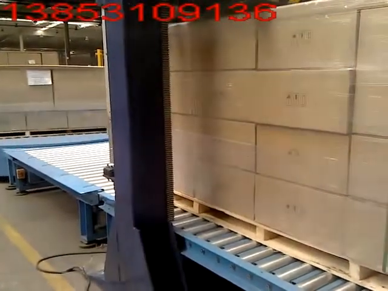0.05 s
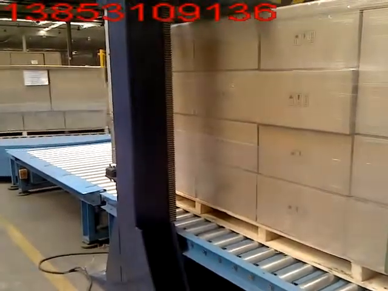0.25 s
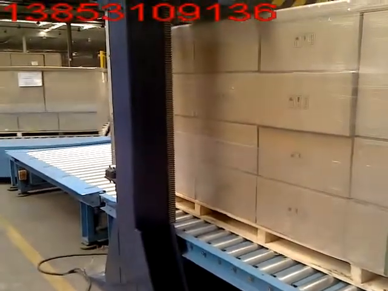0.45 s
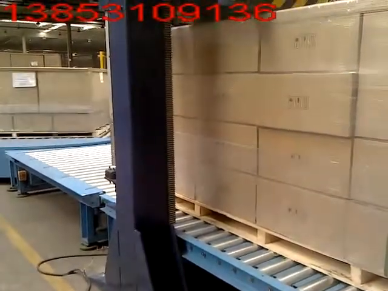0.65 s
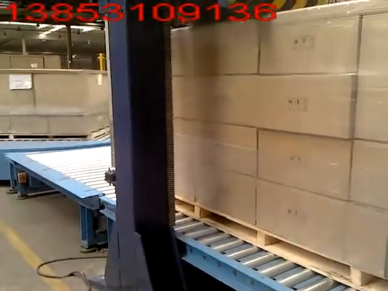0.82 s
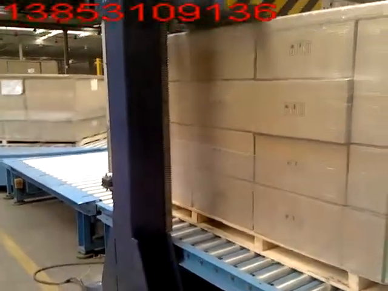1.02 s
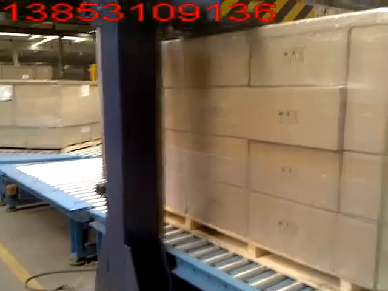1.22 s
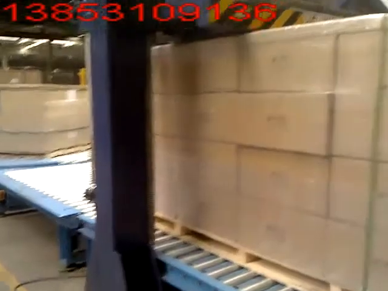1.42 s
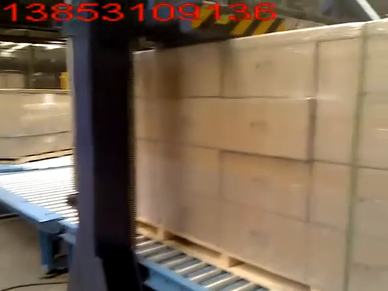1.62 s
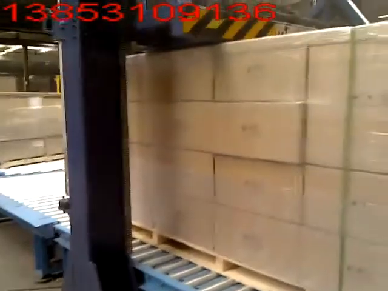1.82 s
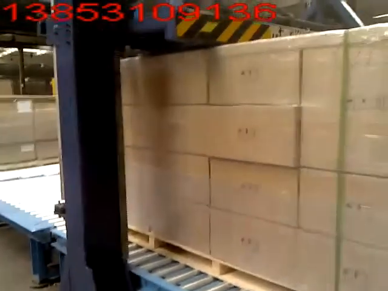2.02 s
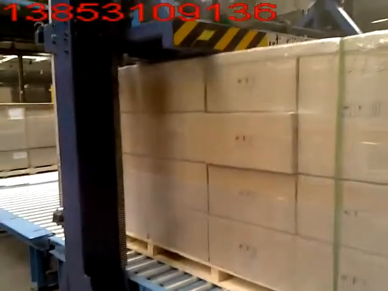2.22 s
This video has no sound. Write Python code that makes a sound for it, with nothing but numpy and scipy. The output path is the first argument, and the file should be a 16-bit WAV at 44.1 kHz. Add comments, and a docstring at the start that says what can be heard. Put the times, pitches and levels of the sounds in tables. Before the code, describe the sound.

A loud steel clang from pallet packaging machinery rings away over steady factory noise.

```python
"""Pallet packaging machine in a factory hall

Over the steady din of the hall comes a knock, then a run of blows excites the modes of a steel frame:
a loud clang that overloads the microphone and rings away. The damped load thuds and scrapes, latches
snap and ring, and a low bump sounds close by. A drive starts up with a rush and a thin harmonic whine.
Impacts and scrapes leave a diffuse reverberant tail."""
import sys
import numpy as np
from scipy import signal
from scipy.fft import rfft, irfft
from scipy.io import wavfile
from scipy.ndimage import uniform_filter1d

SR = 44100
rng = np.random.default_rng(int(sys.argv[2]) if len(sys.argv) > 2 else 0)


def store_pcm(level_fs):
    """Save levels as 16-bit WAV."""
    pcm = np.round(np.clip(level_fs, -1, 1) * 32767).astype(np.int16)
    wavfile.write(sys.argv[1], SR, np.atleast_2d(pcm).T)


N = 103635
T = np.arange(N) / SR
FREQS = np.maximum(np.arange(N // 2 + 1) * SR / N, 1)


def undb(db):
    """Decibels to amplitude ratio."""
    return 10 ** (np.asarray(db) / 20)


def contact(hz, brightness_hz):
    """Finite contact time acts as a low-pass: 12 dB an octave down above brightness_hz."""
    return 1 / np.hypot(1, (hz / brightness_hz) ** 2)


def noise(spectrum, brightness_hz=None):
    """Random phases under a spectral envelope give unit noise, dulled by an optional soft contact."""
    hz, db = np.array(spectrum).T
    gain = undb(np.interp(np.log(FREQS), np.log(hz), db)) * np.minimum(FREQS / hz[0], 1) ** 2
    if brightness_hz:
        gain = gain * contact(FREQS, brightness_hz)
    x = irfft(gain * np.exp(2j * np.pi * rng.random(len(FREQS))), N)
    return x / x.std()


def drift(rate_hz):
    """Low-passed noise gives a random drift of unit spread."""
    x = irfft(rfft(rng.standard_normal(N)) * np.exp(-(FREQS / rate_hz) ** 2), N)
    return x / np.sqrt(np.mean(x ** 2))


def tone(hz, waver):
    """Random modulation: a unit-power sine wavers in level and phase, as heard across a hall."""
    swing = 1 + waver * (drift(rate_hz=6) + 1j * drift(rate_hz=6))
    carrier = np.exp(2j * np.pi * (hz * T + rng.random()))
    return np.sqrt(2 / (1 + 2 * waver ** 2)) * np.real(swing * carrier)


def strike(start_s, attack_s, t60_s):
    """Envelope of a damped vibration: linear rise, exponential decay."""
    age = np.maximum(T - start_s, 0)
    return np.minimum(age / attack_s, 1) * np.exp(-np.log(1000) * age / t60_s)


def band_decay(x, start_s, attack_s, t60_s, damping):
    """Frequency-dependent damping: t60_s holds up to 1 kHz and shortens in each octave above."""
    octave = np.clip(np.log2(FREQS / 1000), 0, 3)
    spectrum = rfft(x)
    bands = [irfft(spectrum * np.maximum(1 - abs(octave - k), 0), N) for k in range(4)]
    return sum(band * strike(start_s, attack_s, t60_s / (1 + damping * k * k))
               for k, band in enumerate(bands))


def hall(x, wet_db):
    """Reverberation: convolution with decaying noise adds a diffuse tail with little deep bass."""
    tail = band_decay(rng.standard_normal(N), start_s=0, attack_s=0.024, t60_s=2.38, damping=0.15)
    tail = signal.sosfilt(signal.butter(2, 133, "high", fs=SR, output="sos"), tail)
    return x + undb(wet_db) * signal.fftconvolve(x, tail / np.linalg.norm(tail))[:N]


# background spectrum of the hall: frequency_hz, density_db
DIN_SPECTRUM = [(25, -8), (60, -4.5), (120, -9.5), (180, -9.5), (280, -2.5), (370, -2.5), (600, -1),
                (850, -6.5), (1400, -3.5), (2250, -6.5), (2650, -10.5), (3800, -11.5), (6000, -22),
                (7400, -33.5)]


def din():
    """Incoherent superposition: distant machines blur into steady noise."""
    return undb(-32.5) * noise(DIN_SPECTRUM)


# impacts on pallet and conveyor: start_s, level_db, brightness_hz, attack_s, t60_s
LOAD_IMPACTS = [(.0, -26.5, 468, 0.0033, 0.58), (0.213, -8.5, 650, 0.021, 0.19),
                (0.298, -6.5, 330, 0.014, .2), (0.424, -16.5, 616, 0.013, 0.26),
                (1.312, -10.5, 673, 0.0075, 0.38), (1.326, -15.5, 403, .004, 0.071),
                (1.376, -14, 920, .004, .2), (1.822, -25, 423, 0.0098, 0.64), (2.02, -21, 400, 0.038, 0.16),
                (2.164, -22.5, 550, 0.042, 0.39)]
# their response before the contact dulls it: frequency_hz, density_db
THUD_SPECTRUM = [(25, -33), (50, -1), (72, -8.5), (110, 5), (150, -2), (200, 1.5), (260, 3.5), (400, -1),
                 (490, 1), (620, -2.5), (1000, -4.5), (2500, -3.5), (5000, 5), (7500, -23.5)]


def thuds():
    """Heavy damping: soft, weighty contacts shake pallet and conveyor in dull, pitchless bursts."""
    bursts = sum(undb(db) * noise(THUD_SPECTRUM, brightness) * strike(start, attack, t60)
                 for start, db, brightness, attack, t60 in LOAD_IMPACTS)
    return hall(bursts, wet_db=-9.5)


# the steel frame's dense crowd of weak modes: frequency_hz, density_db
STEEL_SPECTRUM = [(100, -35), (400, -14), (750, -8), (1050, -9.5), (1400, -0.5), (1850, -7), (2200, -5.5),
                  (3000, -8), (4200, -13.5), (5600, -14), (7500, -20.5)]


def dense_modes(ripple_db=2):
    """Modal overlap: noise gathers into narrow, irregularly spaced resonances."""
    smooth = noise(STEEL_SPECTRUM)
    ripple = uniform_filter1d(uniform_filter1d(rng.standard_normal(len(FREQS)), size=50), size=50)
    rippled = irfft(rfft(smooth) * undb(ripple_db * ripple / ripple.std()), N)
    return rippled * smooth.std() / rippled.std()


# blows on the frame: start_s, level_db, brightness_hz
FRAME_BLOWS = [(.266, -5.5, 1800), (.281, -8.5, 3500), (.295, -7.5, 6000), (.35, -10.5, 4000),
               (.44, -18.5, 3000)]
# strong modes of the frame: pitch_hz, gain_db, t60_s
FRAME_MODES = [(748, -23, 1.3), (831, -24, 1.5), (974.5, -16, 1.4), (1082.6, -16.5, 1.3),
               (1243.5, -14.5, 1.7), (1382, -16, 2.4), (1505.5, -18, 1.5), (1562, -19, 1.2),
               (1616.5, -18, 1.5), (1747.5, -18, 1.4), (1925, -22, 1.2), (2080, -25, 2.2), (2277, -23, 1.2),
               (2554, -25, 1.3), (2752.6, -23, 1.6), (3137, -21, 1.1), (3848, -26, 1.4), (4240, -25, 1.2),
               (5351, -22, 1.1)]


def clang(attack_s=0.009):
    """Modal ringing: quick blows excite the steel frame, their energies adding in each strong mode."""
    steel = rfft(dense_modes())
    crowd, ring = 0, 0
    for start, db, brightness in FRAME_BLOWS:
        struck = irfft(steel * contact(FREQS, brightness), N)
        struck = np.roll(struck / struck.std(), rng.integers(N))  # decorrelates the blows
        crowd += undb(db) * band_decay(struck, start, attack_s, t60_s=0.73, damping=0.015)
    for hz, mode_db, t60 in FRAME_MODES:
        energy = sum((undb(db) * contact(hz, brightness) * strike(start, attack_s, t60)) ** 2
                     for start, db, brightness in FRAME_BLOWS)
        ring += undb(mode_db) * np.sqrt(energy) * tone(hz, waver=0.3)
    return hall(undb(-0.5) * crowd, wet_db=-7) + undb(1) * ring


# latch impacts: start_s, crack_db, crack_t60_s, ring_db
LATCH_SNAPS = [(.562, -13, 0.06, -15), (1.361, -13.5, 0.078, -11), (1.372, -21.5, 0.26, -21),
               (1.802, -10.5, 0.011, -27), (1.81, -19.5, 0.13, -26)]
# spectrum of a crack: frequency_hz, density_db
CRACK_SPECTRUM = [(300, -23), (1200, -10), (2400, -12.5), (3100, -2), (3500, -4.5), (4200, -3),
                  (5500, -11.5), (7500, -19.5)]
# modes of the latch: pitch_hz, gain_db, t60_s
LATCH_MODES = [(2692, -23, 1.4), (3120, -12, .14), (3731, -26, .7), (4145, -21, .55), (4220, -25, 1.1),
               (4500, -15, .12), (5362, -25, .3)]


def latches(crack_attack_s=0.00024, ring_attack_s=0.00082):
    """Impulse excitation: each hard, brief contact gives a broadband crack and rings high modes."""
    cracks = sum(undb(db) * noise(CRACK_SPECTRUM) * strike(start, crack_attack_s, t60)
                 for start, db, t60, _ in LATCH_SNAPS)
    ring = 0
    for hz, mode_db, t60 in LATCH_MODES:
        energy = sum((undb(ring_db) * strike(start, ring_attack_s, t60)) ** 2
                     for start, _, _, ring_db in LATCH_SNAPS)
        ring += undb(mode_db) * np.sqrt(energy) * tone(hz, waver=0.45)
    return hall(cracks, wet_db=-6.5) + ring


def bump(peak_s=1.0, half_width_s=0.0094, pitch_hz=80):
    """A Gaussian wave packet of about two cycles is heard as one soft, low bump close by."""
    offset = T - peak_s
    envelope = undb(-22.5) * np.exp(-(offset / half_width_s) ** 2)
    return envelope * np.sin(2 * np.pi * (pitch_hz * offset + rng.random()))


# slips of the load: start_s, level_db, length_s
LOAD_SLIPS = [(1.04, -33, 0.14), (1.16, -30.5, 0.14), (1.282, -34.5, 0.14), (1.455, -44, .08)]
# spectrum of the friction: frequency_hz, density_db
FRICTION_SPECTRUM = [(500, -20.5), (2000, -8), (3800, -14.5), (5500, -21), (7500, -33)]


def scrapes():
    """Sliding friction: the shifting load gives brief, grainy swells of noise."""
    swell = sum(undb(db) * np.sin(np.pi * np.clip((T - start) / length, 0, 1))
                for start, db, length in LOAD_SLIPS)
    friction = noise(FRICTION_SPECTRUM) * undb(1.7 * drift(rate_hz=150))
    return hall(swell * friction, wet_db=-3)


# partials of the whine: harmonic_number -> level_db
WHINE_HARMONICS = {6: -41.5, 7: -42.5, 8: -45, 10: -54}
# loudness contour of the machine's rush: time_s, level_db
RUSH_CONTOUR = [(0, -62.5), (1.05, -65), (1.25, -28), (1.55, -34.5), (1.77, -43), (1.83, -28),
                (2.05, -32.5), (2.2, -34), (2.35, -44)]
# spectrum of the rush: frequency_hz, density_db
RUSH_SPECTRUM = [(100, -2), (300, -1.5), (700, -4.5), (1400, -3.5), (2200, -7), (3200, -10.5),
                 (4500, -17.5), (6000, -18), (7500, -24)]


def drive(whine_start_s=1.4, fade_in_s=0.17, fundamental_hz=403.2):
    """Periodic motion sounds at multiples of its rate: high harmonics whine over the machine's rush."""
    fade_in = np.clip((T - whine_start_s) / fade_in_s, 0, 1)
    whine = sum(undb(db) * tone(k * fundamental_hz, waver=0.6) for k, db in WHINE_HARMONICS.items())
    rush_db = np.interp(T, *np.array(RUSH_CONTOUR).T) + 1.2 * drift(rate_hz=40)
    return fade_in * whine + undb(rush_db) * noise(RUSH_SPECTRUM)


def scene():
    """Superposition: the pressures of all sources add at one microphone."""
    return (din() + thuds() + clang() + latches() + bump() + scrapes() + drive())[None]


# band limit set by the recorder's low sample rate: frequency_hz, gain_db
RECORDER_BAND_LIMIT = [(6000, 0.5), (7400, -4.5), (7900, -29), (8600, -13.5), (9800, -21.5)]


def record(dry):
    """Microphone saturation flattens peaks; the recorder's band limit cuts treble above about 7.5 kHz."""
    ceiling, knee, top_hz = 0.95, 5, 9800
    saturated = dry / (1 + abs(dry / ceiling) ** knee) ** (1 / knee)
    response = undb(np.interp(FREQS, *np.array(RECORDER_BAND_LIMIT).T))
    dulled = irfft(rfft(saturated) * response, N)
    return signal.sosfilt(signal.ellip(8, .2, 70, top_hz, fs=SR, output="sos"), dulled)


dry = scene()
out = record(dry)
store_pcm(out)
```